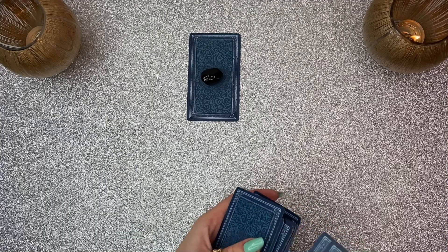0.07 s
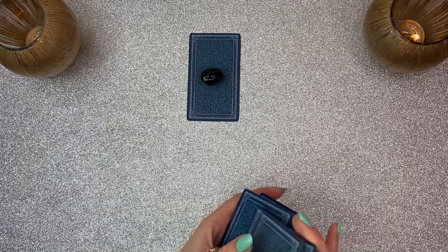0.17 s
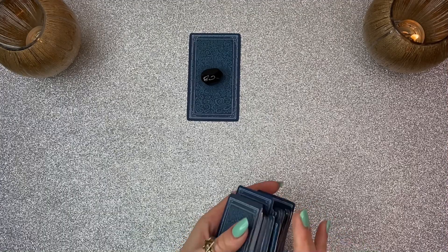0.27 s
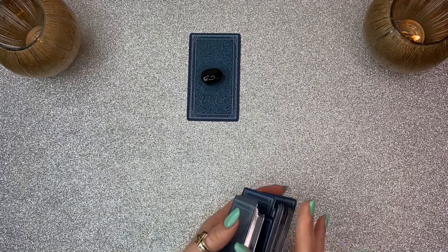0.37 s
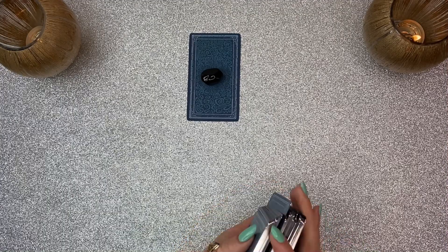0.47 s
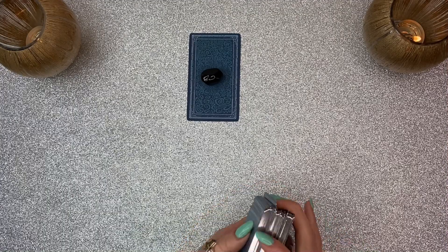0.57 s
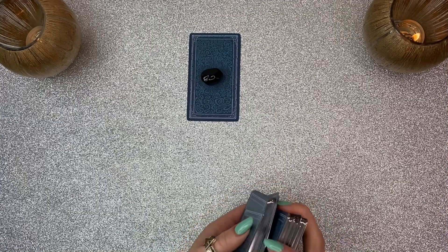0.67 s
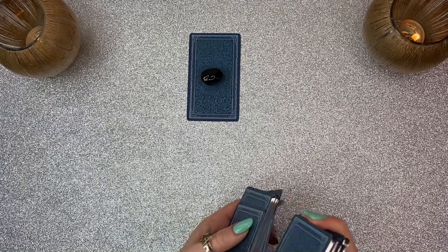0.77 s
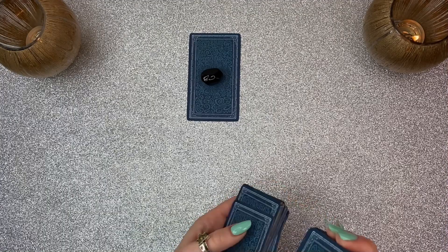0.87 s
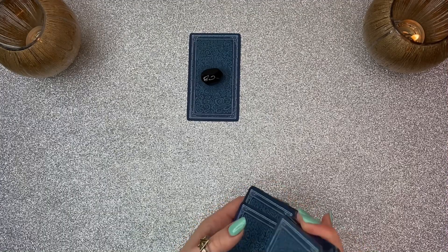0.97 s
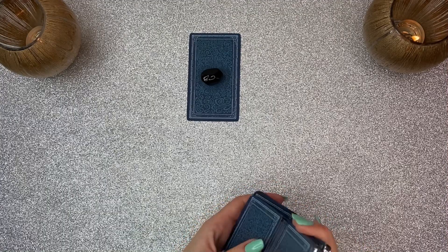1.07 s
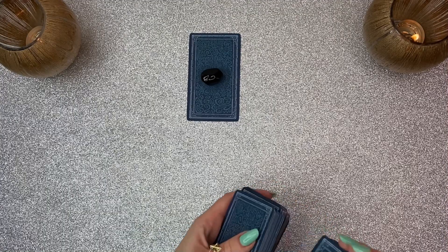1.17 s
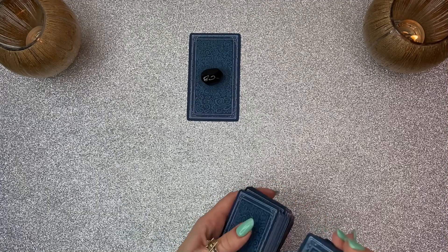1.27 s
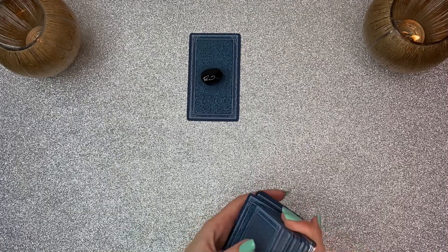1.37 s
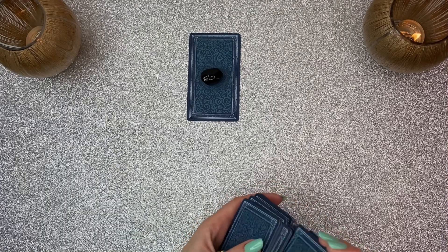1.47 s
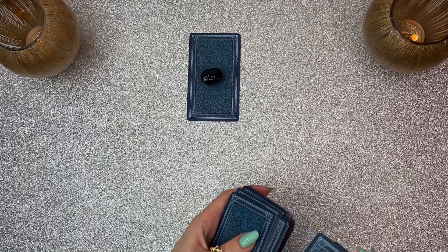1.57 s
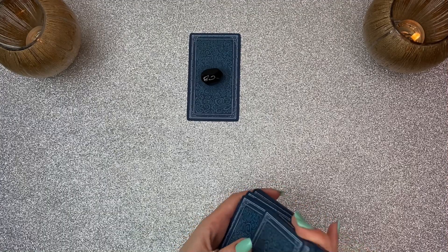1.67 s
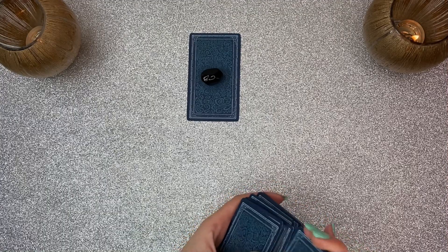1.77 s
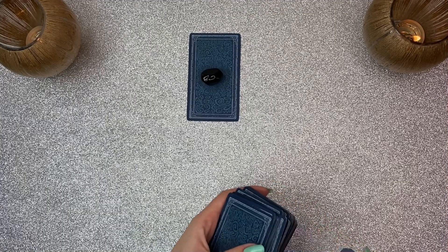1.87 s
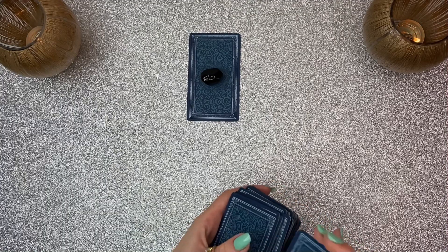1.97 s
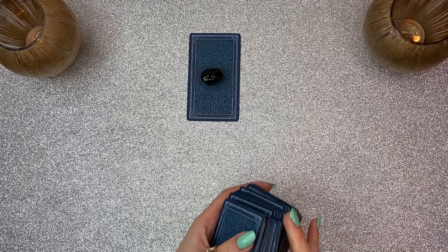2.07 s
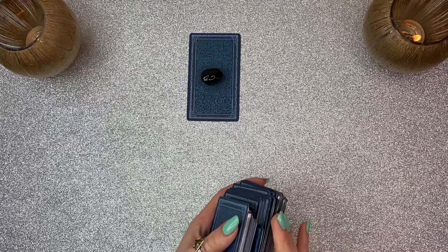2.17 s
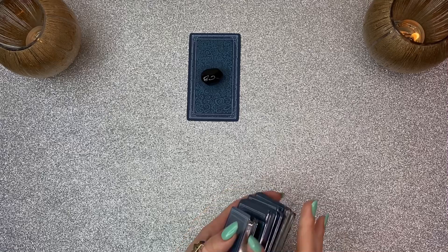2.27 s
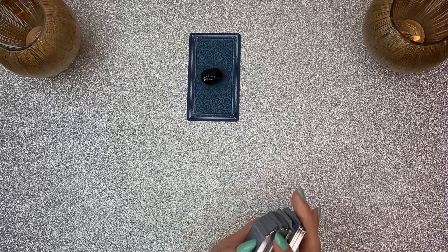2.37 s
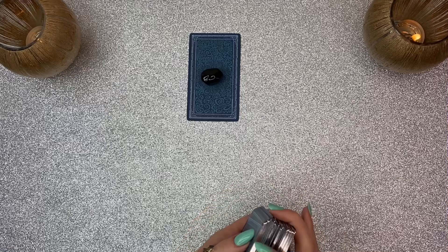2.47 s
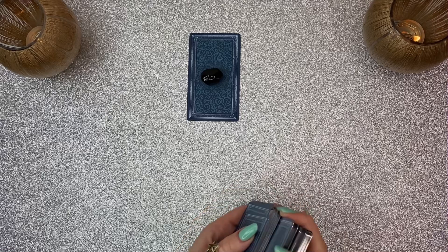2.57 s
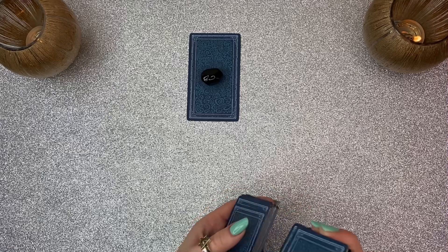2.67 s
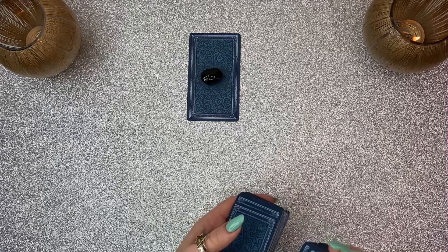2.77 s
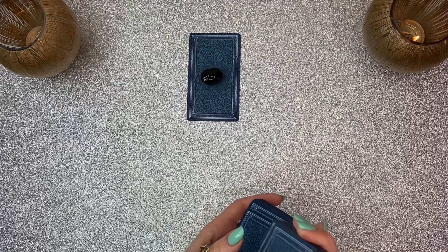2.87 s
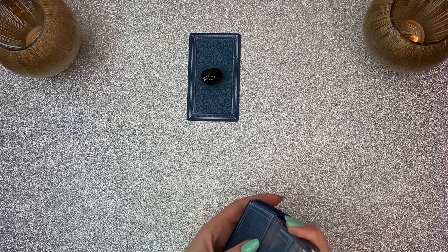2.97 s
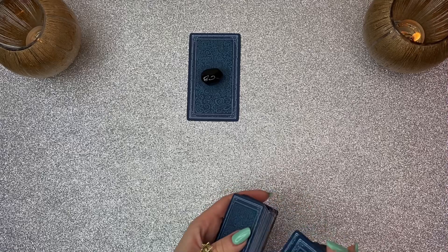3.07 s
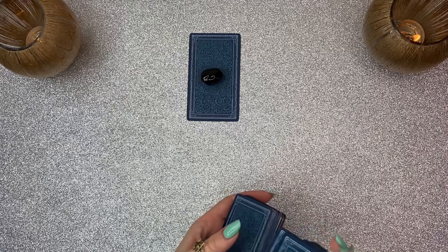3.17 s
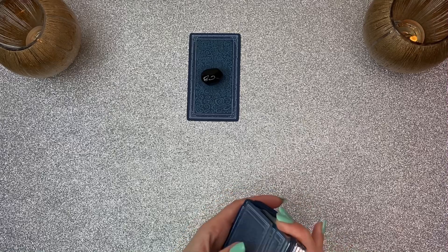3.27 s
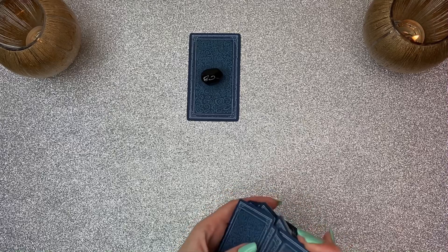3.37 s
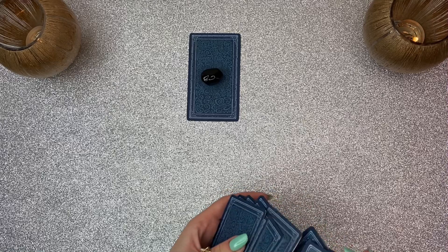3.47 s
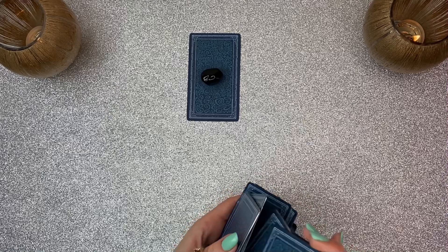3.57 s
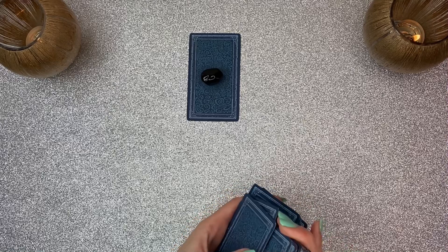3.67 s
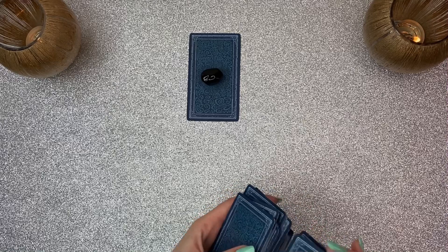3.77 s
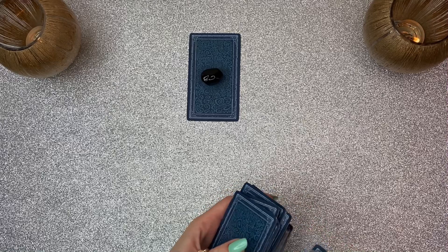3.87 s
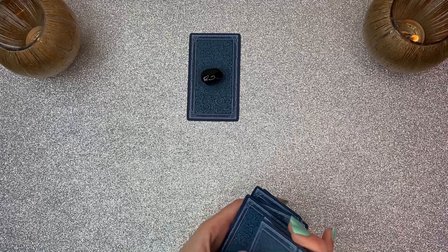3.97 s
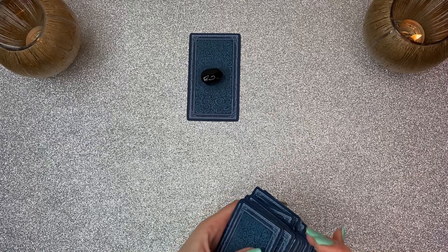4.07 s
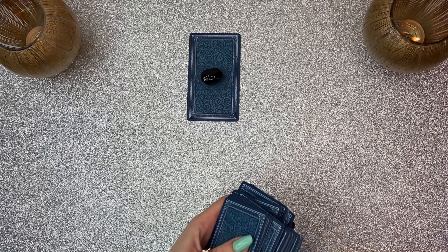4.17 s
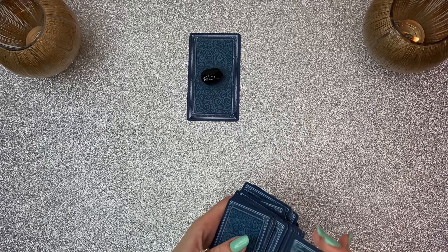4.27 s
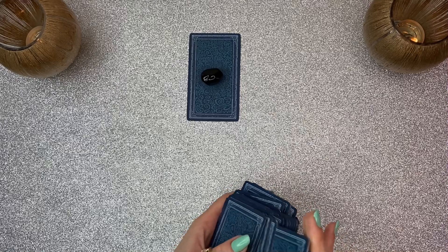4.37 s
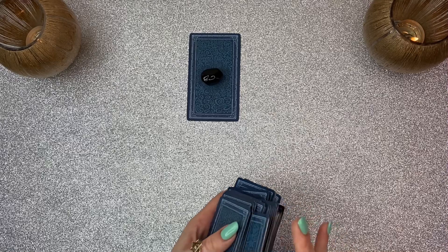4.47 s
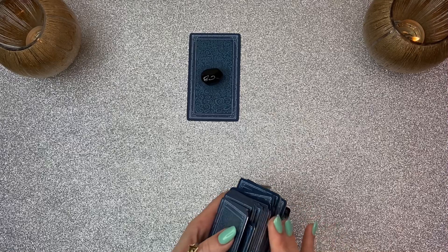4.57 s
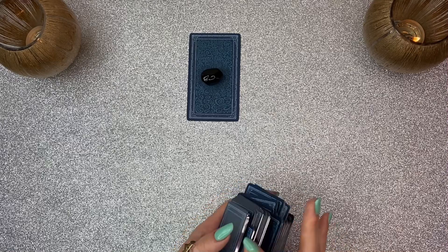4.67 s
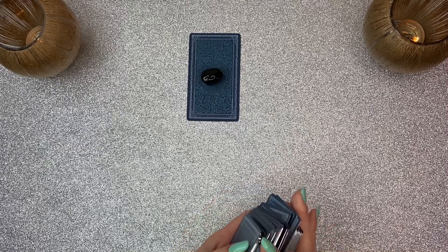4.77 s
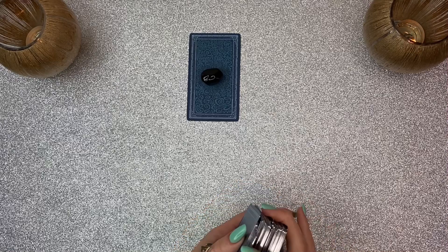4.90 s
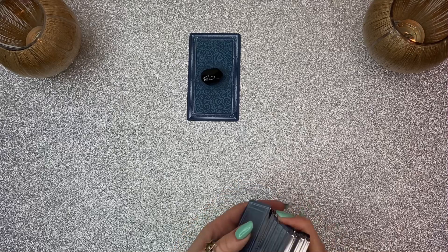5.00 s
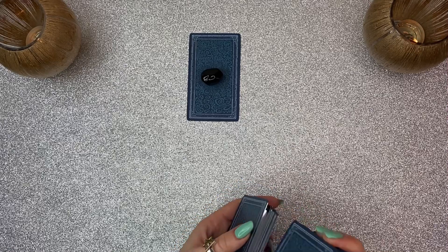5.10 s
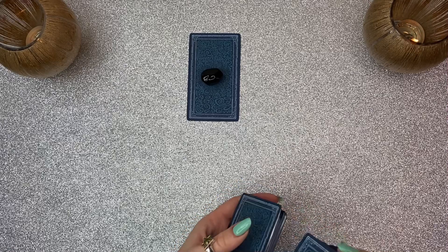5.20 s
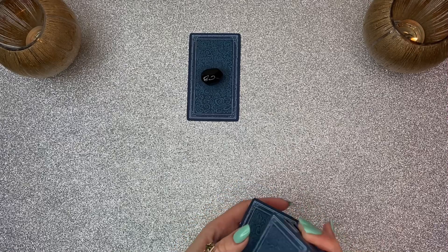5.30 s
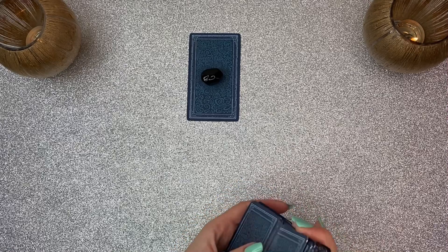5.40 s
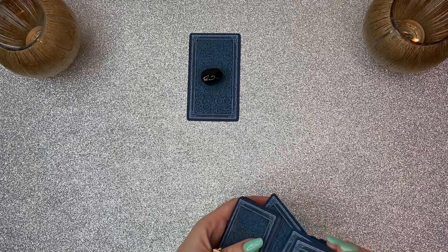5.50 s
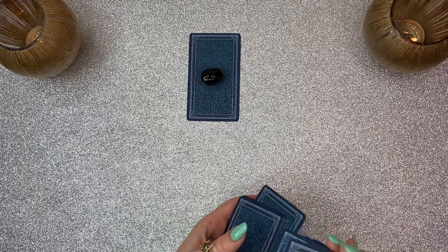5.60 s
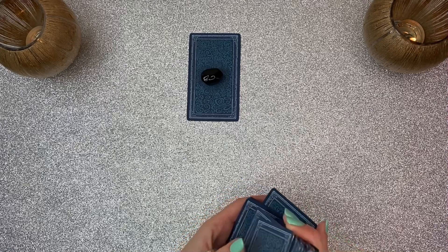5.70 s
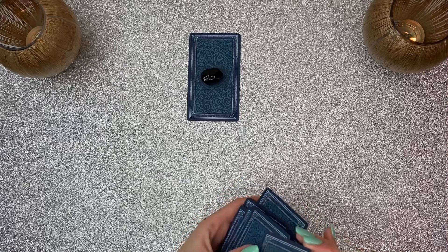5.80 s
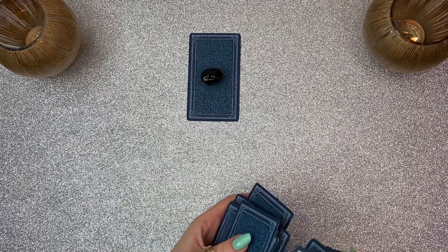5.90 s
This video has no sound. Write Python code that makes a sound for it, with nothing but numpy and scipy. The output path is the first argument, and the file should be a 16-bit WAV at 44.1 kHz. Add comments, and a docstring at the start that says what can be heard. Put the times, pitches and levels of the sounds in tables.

```python
"""Papery hisses swell and end in slaps, ticks and hollow notes: large cards are shuffled overhand.
The deck is held above a cloth-covered table in a small, quiet room, with a close pair of microphones.
Sliding packets are fluttering noise, and landings are clicks with short noise bursts; both ring resonances
of the cupped air, and landings also ring the deck. Low thuds are the deck bumping into the palm.
A short room tail, faint air noise and a wavering drone lie behind."""
import sys
import numpy as np
from scipy import signal
from scipy.fft import rfft, irfft, next_fast_len
from scipy.io import wavfile

SR = 44100
rng = np.random.default_rng(int(sys.argv[2]) if len(sys.argv) > 2 else 0)


def store_wav(level_fs):
    """Save 16-bit WAV to argv[1]."""
    pcm = np.round(np.clip(np.atleast_2d(level_fs), -1, 1) * 32767)
    wavfile.write(sys.argv[1], SR, pcm.T.astype(np.int16))


N = 261954  # length in samples
TIME = np.arange(N) / SR  # seconds

# Packets landing on the deck; levels are before the trim in slaps():
# [start_s, edge_crack_db, cupped_air_db, deck_knock_db, t60_s]
LANDINGS = [(0.159, -50, -54, -60, 0.027), (0.1998, -49.5, -71, -52.5, 0.025),
            (0.524, -54, -72, -74, 0.029), (0.7757, -56, -58, -59, 0.014), (0.8017, -55, -64, -60, 0.014),
            (1.0319, -43.5, -48.5, -52.5, 0.023), (1.105, -45, -56.5, -59.5, 0.0097),
            (1.354, -50, -50.5, -56.5, 0.03), (1.49, -39.5, -58, -54.5, 0.0041),
            (1.715, -40, -35, -54, 0.041), (1.777, -56, -48, -47.5, 0.016),
            (1.7981, -34, -39, -36.5, 0.017), (1.8028, -43, -56, -64, 0.018),
            (2.0088, -29.5, -40, -55, 0.023), (2.062, -48, -65, -51, 0.031), (2.2333, -46, -80, -80, 0.033),
            (2.611, -65, -67.5, -67.5, 0.013), (2.6334, -59, -66.5, -66.5, 0.0046),
            (2.66, -79, -70, -72.5, 0.014), (2.685, -69.5, -83, -81, 0.0053), (2.773, -86, -64, -74, 0.018),
            (2.8943, -48, -56.5, -56.5, 0.0062), (2.927, -39, -40.5, -42, 0.065),
            (3.033, -47.5, -57, -56.5, 0.029), (3.053, -47, -56, -53, 0.019),
            (3.268, -40, -38.5, -53, 0.0096), (3.28, -49, -48.5, -58, 0.025),
            (3.401, -53, -60.5, -57.5, 0.022), (3.553, -58.5, -70, -72, 0.017),
            (3.606, -47, -48, -53, 0.014), (3.6251, -47, -55, -61, 0.013), (3.7386, -56, -58, -55, 0.014),
            (3.756, -43, -51.5, -62.5, 0.034), (3.7727, -46.5, -53, -51.5, 0.011),
            (4.116, -43.5, -51.5, -55.5, 0.021), (4.3063, -31, -52, -56, 0.012),
            (4.3108, -27.5, -40, -51, 0.032), (4.611, -58, -60, -54.5, 0.02),
            (4.79, -60, -61.5, -69, 0.028), (5.0411, -71, -58, -64.5, 0.019),
            (5.1117, -66.5, -73.5, -69, 0.008), (5.369, -63, -41, -48.5, 0.017),
            (5.3801, -44, -43.5, -57, 0.0064), (5.3859, -41, -39, -50.5, 0.028),
            (5.4617, -40, -47.5, -40.5, 0.032), (5.4889, -48.5, -54.5, -45, 0.011),
            (5.7389, -49, -48, -57, 0.021), (5.8175, -41, -46, -40.5, 0.026),
            (5.8867, -51, -58, -53, 0.032)]
# Spectrum of card edges cracking together: [frequency_hz, relative_level_db]
EDGE_SPECTRUM = [(300, -46.5), (700, -10), (1100, -8.5), (1800, -5.5), (2400, 2), (3000, 2), (4000, -3.5),
                 (5400, -2), (7500, -6), (10000, -8.5), (15500, -15)]
# Air pocket between hand and cards, whose size the grip sets: [time_s, pitch_hz]
POCKET_PITCH = [(.2, 1200), (1.35, 1660), (1.72, 1250), (2.0, 1590), (2.93, 1287), (3.27, 1346),
                (4.3, 1870), (5.38, 1400), (5.82, 1295)]
# Resonances of the deck: [pitch_hz, width_hz, relative_level_db]
DECK_MODES = [(440.4, 52, -2), (601, 140, -2), (734, 325, 6), (937, 280, 2)]
NEAR_T60_S, NEAR_DB = 0.048, -13.5  # quick echoes off hands and table, against the start of the landing


def slaps(knock_trim_db=2.0, grain_db=5.0, push_share=0.65, near_delay_s=0.0009,
          click_db=-11.0, click_delay_s=0.0005, pocket_width=0.27):
    """A packet lands with a click and its cards follow a hair apart; this rings the air pocket and the deck."""
    size = 4410
    t = TIME[:size]
    out = np.zeros((2, N + size))
    to_10_ms = np.sqrt(SR / 100 / size)  # gives each landing the energy of 10 ms at its level
    near = from_db(NEAR_DB) * dying(t, NEAR_T60_S) * (t > near_delay_s)
    impulse = signal.unit_impulse(size, round(click_delay_s * SR))
    click = from_db(click_db) * rms_one(impulse)
    for start_s, crack_db, air_db, knock_db, t60 in LANDINGS:
        scatter = stereo_noise(size) * flutter(rate=3000, depth_db=grain_db, size=size)
        firm_click = click * min(1, 0.0052 / t60)  # a loose landing has less of a click
        edges = firm_click + rms_one(scatter * np.hypot(dying(t, t60), near))
        # the push on the deck is shorter than the scatter of edges
        push = firm_click + rms_one(scatter * np.hypot(dying(t, t60 * push_share), near))
        pocket_hz = np.interp(start_s, *np.transpose(POCKET_PITCH))
        hit = from_db(crack_db) * rms_one(colour(edges, EDGE_SPECTRUM))
        hit += resonate(edges, [(pocket_hz, pocket_width * pocket_hz, air_db)])
        hit += from_db(knock_db + knock_trim_db) * rms_one(resonate(push, DECK_MODES))
        start = round(start_s * SR)
        out[:, start:start + size] += to_10_ms * hit
    return out[:, :N]


# Spectrum of card faces rubbing: [frequency_hz, relative_level_db]
FRICTION_SPECTRUM = [(80, -8), (200, -7), (400, -14), (800, -12.5), (1500, -12.5), (2500, -3), (4000, -2),
                     (5800, 0), (7800, -1.5), (10000, -1), (13000, -4.5), (15500, -11.5)]
# Resonances of the air cupped over a sliding packet: [pitch_hz, width_hz, relative_level_db]
CUPPED_AIR_MODES = [(1100, 420, 0.5), (1490, 220, -5.5), (1875, 300, 4)]
# A card edge drags with a rasping pitch: [middle_s, spread_s, pitch_hz, level_db]
EDGE_RASPS = [(3.77, 0.012, 4530, -43.5), (4.506, 0.048, 3050, -56.5), (4.793, 0.025, 4700, -58.5)]


def sliding(hiss_trim_db=-1.5, air_trim_db=-8.5, grain_db=1.0, catch_db=2.5, catch_rate=150):
    """Card faces rub: fine paper grain, with small catches and ticks, hisses and stirs the cupped air."""
    hiss_gain, air_gain = slide_levels()
    grain = flutter(rate=2100, depth_db=grain_db, size=N)
    catches = flutter(rate=catch_rate, depth_db=catch_db, size=N)
    rub = stereo_noise(N) * grain * catches
    ticks = from_db(-10) * edge_ticks()
    hiss = rms_one(colour(rub, FRICTION_SPECTRUM)) + ticks
    air = rms_one(resonate(rub, CUPPED_AIR_MODES, skirt=15.0))
    out = hiss_gain * from_db(hiss_trim_db) * hiss
    out += air_gain * from_db(air_trim_db) * air
    for middle_s, spread_s, pitch_hz, rasp_db in EDGE_RASPS:
        swell = np.exp(-((TIME - middle_s) / spread_s) ** 2)
        out += swell * resonate(rub, [(pitch_hz, 0.34 * pitch_hz, rasp_db)])
    return out


def edge_ticks(per_s=55, spread_db=5.5, t60=0.0029):
    """Single card edges slip off one another at random moments; rms 1."""
    strength_db = spread_db * np.clip(rng.standard_normal(N), -2, 1.5)
    slips = (rng.random(N) < per_s / SR) * from_db(strength_db)
    bursts = signal.lfilter([1], [1, -dying(1 / SR, t60)], slips + 1e-18)
    return rms_one(colour(stereo_noise(N) * bursts, EDGE_SPECTRUM))


# A packet is let go and skids down the deck; hiss and air are before the trims in sliding():
# [start_s, length_s, friction_hiss_db, cupped_air_db, treble_db]
DROPS = [(0.0, 0.034, -53, -59.5, -21), (0.151, 0.039, -50, -79, 1), (0.501, 0.036, -52, -57.5, -6.5),
         (0.764, 0.048, -59.5, -61.5, -12), (1.027, 0.049, -44.5, -48, 6.5),
         (1.349, 0.034, -51.5, -49, 0.5), (1.687, 0.093, -42, -48, -3), (2.001, 0.075, -39.5, -44.5, -2.5),
         (2.21, 0.097, -52.5, -72, 3.5), (2.484, 0.038, -52.5, -63, -9), (2.598, 0.015, -67.5, -66, 11),
         (2.91, 0.11, -44.5, -62, -1), (3.257, 0.02, -43, -46, -2), (3.593, 0.033, -43.5, -49, 4),
         (3.978, 0.044, -42.5, -54, 0), (4.297, 0.087, -41.5, -53, -7.5), (4.78, 0.077, -55, -59, 2.5),
         (5.352, 0.042, -44, -45, -0.5), (5.723, 0.15, -48.5, -47.5, 2.5)]
DROP_ATTACK_S, DROP_SAG_DB_PER_S = 0.016, 42.5  # it starts at once, then friction slows it
# The fingers draw or push a packet through the deck; hiss is before the trim in sliding():
# [start_s, length_s, friction_hiss_db, treble_db]
DRAWS = [(0.177, 0.034, -41, 0), (0.272, 0.032, -46, 0), (0.326, .05, -52, -8), (0.341, 0.12, -58, 4),
         (0.557, 0.099, -58.5, 2.5), (0.635, .045, -52.5, 3), (0.69, 0.062, -61, 6.5),
         (0.861, 0.043, -67.5, 12.5), (0.991, 0.081, -53, -1.5), (1.313, .02, -65, 0),
         (1.367, 0.02, -44.5, 3.5), (1.418, 0.039, -46.5, -1), (2.093, 0.061, -50.5, -4),
         (2.344, 0.13, -62, 5), (2.526, 0.054, -69.5, -1.5), (3.204, 0.039, -65.5, -2),
         (3.287, 0.066, -57.5, 1.5), (3.322, 0.11, -52, 0), (3.499, 0.098, -55, 7),
         (3.656, 0.089, -47.5, 0), (4.032, 0.067, -59, -2), (4.423, 0.062, -51.5, 4),
         (4.473, 0.081, -48.5, -2.5), (4.622, 0.08, -49, -6), (4.869, 0.15, -61.5, 1.5),
         (5.012, 0.08, -63.5, 11), (5.384, 0.095, -54, -1), (5.694, 0.038, -62.5, -0.5),
         (5.805, 0.038, -44, -1.5)]
DRAW_RISE_SHARE, DRAW_SAG_DB_PER_S = 0.83, 36.5  # it gathers speed over most of its length
DRAW_AIR_DB = -18  # the packet lies flat, so little air is cupped; against the hiss, before the trims


def slide_levels():
    """Gains of the friction hiss and of the cupped air: the powers of all drops and draws add up."""
    hiss, air = np.zeros((2, N))
    for start_s, length_s, hiss_db, air_db, _ in DROPS:
        power = stroke(start_s, length_s, DROP_ATTACK_S, DROP_SAG_DB_PER_S)
        hiss += from_db(hiss_db) ** 2 * power
        air += from_db(air_db) ** 2 * power
    for start_s, length_s, hiss_db, _ in DRAWS:
        shape = stroke(start_s, length_s, DRAW_RISE_SHARE * length_s, DRAW_SAG_DB_PER_S)
        power = from_db(hiss_db) ** 2 * shape
        hiss += power
        air += from_db(DRAW_AIR_DB) ** 2 * power
    return np.sqrt(hiss), np.sqrt(air)


STOP_DB_PER_S = 302  # added to the sag once a sliding packet comes to rest


def stroke(start_s, length_s, rise_s, sag_db_per_s):
    """Power of one slide: it swells, sags while the packet moves, and falls away when it stops."""
    size = 26460
    t = TIME[:size]
    out = np.zeros(N + size)
    swell = np.sin(np.pi / 2 * np.minimum(t / rise_s, 1))
    sag_db = sag_db_per_s * np.maximum(t - rise_s, 0)
    stop_db = STOP_DB_PER_S * np.maximum(t - length_s, 0)
    first = max(round(start_s * SR), 0)
    out[first:first + size] = (swell * from_db(-sag_db - stop_db)) ** 2
    return out[:N]


def beamed(x, shelf_hz=7000):
    """The treble is directional: it comes and goes as the hands turn the deck."""
    high_pass = signal.butter(2, shelf_hz, "high", fs=SR, output="sos")
    treble = signal.sosfiltfilt(high_pass, x)
    return x + (from_db(facing_db()) - 1) * treble


def facing_db():
    """Treble level: each slide turns the card edges to or from the microphones, with glides between."""
    turns = sorted((start_s + length_s / 2, treble_db) for start_s, length_s, *_, treble_db in DROPS + DRAWS)
    return np.interp(TIME, *np.transpose(turns))


# The deck bumps into the palm: [start_s, level_db]
PALM_BUMPS = [(1.071, -60), (1.459, -56), (2.94, -60), (3.056, -59.5), (3.279, -57.5), (4.334, -59),
              (4.374, -56.5), (5.464, -46.5), (5.489, -45), (5.756, -53.5), (5.819, -56.5)]
# Resonances of the palm: [pitch_hz, width_hz, relative_level_db]
PALM_MODES = [(116, 27, -5), (155.6, 39, 1), (235, 145, 0), (412, 130, -17)]


def bumps(fade_db_per_s=903.0):
    """Soft blows on the palm: a very short noise burst rings low resonances as a thud."""
    size = 8820
    out = np.zeros((2, N + size))
    to_10_ms = np.sqrt(SR / 100 / size)  # gives each bump the energy of 10 ms at its level
    for start_s, bump_db in PALM_BUMPS:
        blow = stereo_noise(size) * from_db(-fade_db_per_s * TIME[:size])
        thud = rms_one(resonate(blow, PALM_MODES))
        start = round(start_s * SR)
        out[:, start:start + size] += from_db(bump_db) * to_10_ms * thud
    return out[:, :N]


# Spectrum of the room's tail: [frequency_hz, level_db]
ROOM_COLOUR = [(100, -3), (600, -13.5), (1400, -9), (3500, -8.5), (7000, -11.5), (10000, -19.5)]
ROOM_T60_S, TREBLE_T60_S, TREBLE_HZ = 0.41, 0.1, 7800  # the tail dies sooner above TREBLE_HZ


def room(x, wall_delay_s=0.0054):
    """The walls return a decaying scatter of echoes; its treble dies sooner."""
    size = 26460
    t = TIME[:size]
    scatter = stereo_noise(size) * (t > wall_delay_s)
    tail = 0
    for kind, t60 in (("low", ROOM_T60_S), ("high", TREBLE_T60_S)):
        band = signal.butter(3, TREBLE_HZ, kind, fs=SR, output="sos")
        tail = tail + signal.sosfilt(band, rms_one(scatter * dying(t, t60)))
    echoes = colour(tail, ROOM_COLOUR) / np.sqrt(size)
    return signal.fftconvolve(x, echoes, axes=-1)[:, :N]


# Spectrum of the air noise in the room: [frequency_hz, relative_level_db]
AIR_SPECTRUM = [(25, -23.5), (45, 1.5), (180, -7), (330, -10), (850, -23.5), (1450, -17), (4000, -22),
                (7500, -22.5), (15000, -33)]
# Ventilation drone: [pitch_hz, width_hz, level_db]
VENTILATION_MODES = [(63.3, 25, -83.5), (110.2, 14, -88.5), (163.4, 9.1, -79)]
ROOM_TONE_DB = -78  # rms of the air noise


def room_tone(wander_db=3.5):
    """Faint shaped air noise with a low ventilation drone of narrow, wavering noise bands."""
    gain = from_db(at_hz(AIR_SPECTRUM, np.fft.rfftfreq(N, 1 / SR)))
    air = irfft(rfft(stereo_noise(N)) * gain, N)
    drone = resonate(stereo_noise(N), VENTILATION_MODES)
    drone = drone * flutter(rate=9.3, depth_db=wander_db, size=N)
    return from_db(ROOM_TONE_DB) * rms_one(air) + drone


# Likeness of left and right at the sources (1 is identical): [frequency_hz, likeness]
LEFT_RIGHT_LIKENESS = [(100, .93), (400, .86), (1200, .7), (3000, .55), (7000, .48)]


def stereo_noise(size):
    """White noise, alike in both channels in the bass and less so higher up."""
    padded = next_fast_len(size)
    mid, side = rfft(rng.standard_normal((2, padded)))
    alike = np.clip(at_hz(LEFT_RIGHT_LIKENESS, np.linspace(0, SR / 2, len(mid))), 0, 1)
    pair = np.sqrt(1 + alike) * mid + np.sqrt(1 - alike) * side * [[1], [-1]]
    return rms_one(irfft(pair, padded)[:, :size])


def flutter(rate, depth_db, size):
    """A random gain that changes about `rate` times a second; rms 1."""
    steps = rng.standard_normal(size)
    wander = np.interp(np.arange(size) * rate / SR, np.arange(size), steps)
    return rms_one(from_db(depth_db * wander))


def resonate(x, modes, skirt=3.27):
    """Parallel resonances, each with the power of its level; a second, wider pass trims the skirts."""
    out = 0
    for hz, width, level_db in modes:
        rung = x
        for pole_width in (width, width * skirt):
            r = np.exp(-np.pi * pole_width / SR)
            rung = signal.lfilter([1, 0, -1], [1, -2 * r * np.cos(2 * np.pi * hz / SR), r * r], rung)
        out = out + from_db(level_db) * rms_one(rung)
    return out


def colour(x, spectrum):
    """Causal (minimum-phase) filter with the given spectrum, made by folding its cepstrum."""
    size = 512
    gain = from_db(at_hz(spectrum, np.fft.rfftfreq(size, 1 / SR)))
    cepstrum = irfft(np.log(gain))
    cepstrum[1:size // 2] *= 2
    cepstrum[size // 2 + 1:] = 0
    response = irfft(np.exp(rfft(cepstrum)))
    return signal.fftconvolve(x, response[None], axes=-1)[:, :x.shape[-1]]


def dying(t, t60):
    """A fall of 60 dB in t60 seconds."""
    return from_db(-60 * t / t60)


def from_db(db):
    """Decibels to gain."""
    return 10 ** (np.asarray(db) / 20)


def rms_one(x):
    """Scale each channel to unit rms."""
    return x / np.sqrt(np.mean(x ** 2, axis=-1, keepdims=True) + 1e-20)


def at_hz(points, hz):
    """Read a table on a log-frequency axis."""
    f, value = np.transpose(points)
    return np.interp(np.log(np.maximum(hz, 1)), np.log(f), value)


def scene():
    """Slaps, slides and palm bumps sound together in the room, over its faint noise."""
    cards = beamed(slaps() + sliding()) + bumps()
    return cards + room(cards) + room_tone()


# Level balance of the microphone pair: [frequency_hz, left_minus_right_db]
PAIR_BALANCE = [(100, 0.5), (250, 2), (700, -1.5), (1400, -2.5), (2800, -2), (5200, -4.5), (7600, -1),
                (8500, 1)]
# Phase between the microphones: [frequency_hz, left_lead_rad]
PAIR_PHASE = [(0, 0), (860, -.4), (1800, 0), (2600, -1.1), (4100, -.4), (6300, -.5), (7300, 0), (8400, 3),
              (9000, 3.3), (10500, 6.2), (11600, 6.3), (13000, 9.2), (13900, 9.6), (15300, 12.5)]
JOINED_ABOVE_HZ, CUTOFF_HZ = 8000, 15900  # one shared treble signal; upper end of the microphones


def record(dry):
    """The two channels share one treble, differ in level and phase, and are cut at both ends."""
    size = next_fast_len(N + 4096)
    hz = np.fft.rfftfreq(size, 1 / SR)
    left, right = rfft(dry, size)
    joined = np.pi / 4 * (1 + np.tanh((hz - JOINED_ABOVE_HZ) / 200))
    left = np.cos(joined) ** 2 * left + np.sin(joined) ** 2 * right
    # each channel takes half of the level and phase difference
    half_gain = from_db(at_hz(PAIR_BALANCE, hz) / 2)
    half_turn = np.exp(.5j * np.interp(hz, *np.transpose(PAIR_PHASE)))
    tilt = half_gain * half_turn
    pair = irfft([left * tilt, right / tilt], size)[:, :N]
    low_cut = signal.butter(6, 37, "high", fs=SR, output="sos")
    high_cut = signal.ellip(10, .2, 70, CUTOFF_HZ, fs=SR, output="sos")
    return signal.sosfilt(high_cut, signal.sosfilt(low_cut, pair))


dry = scene()
out = record(dry)
store_wav(out)
```